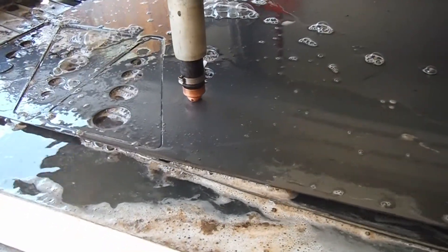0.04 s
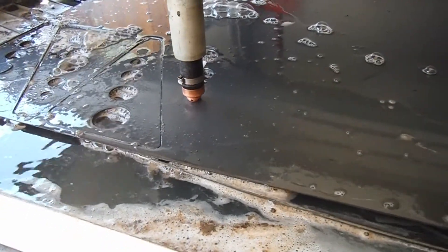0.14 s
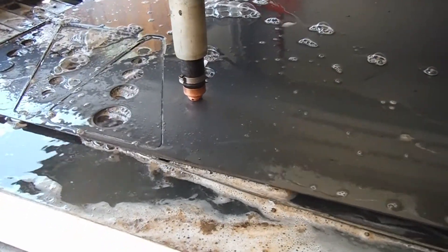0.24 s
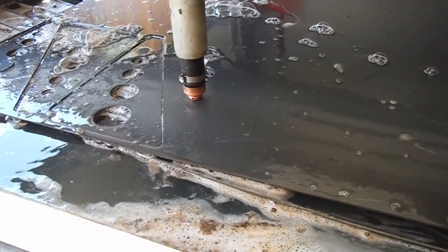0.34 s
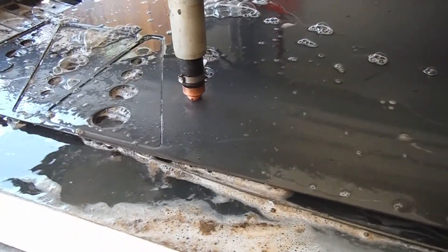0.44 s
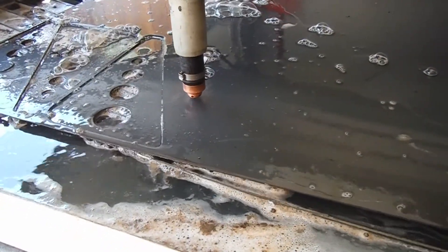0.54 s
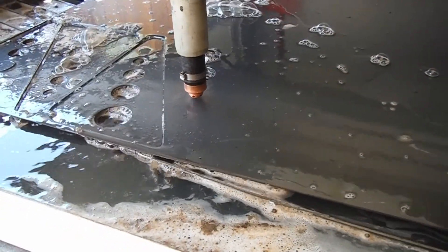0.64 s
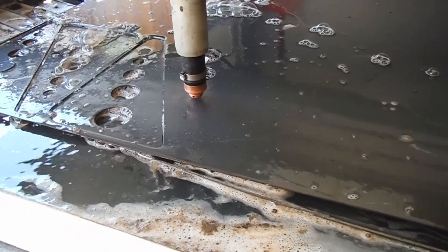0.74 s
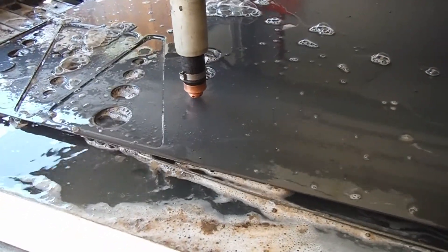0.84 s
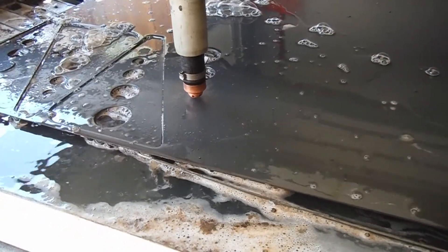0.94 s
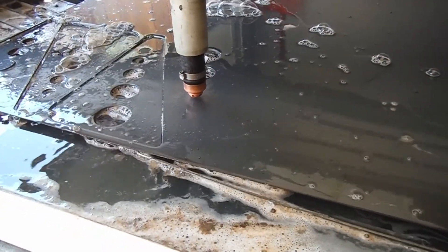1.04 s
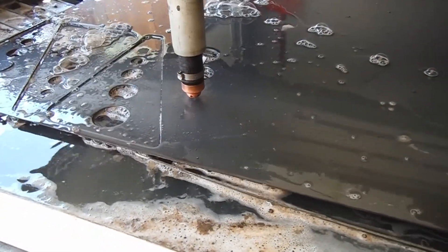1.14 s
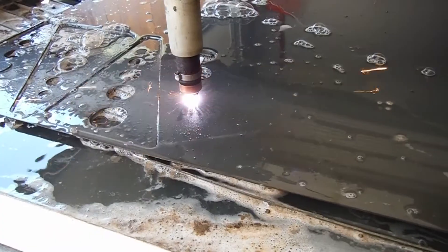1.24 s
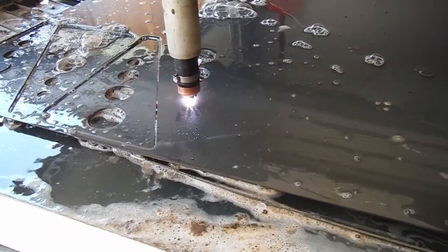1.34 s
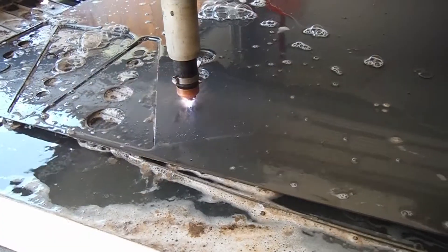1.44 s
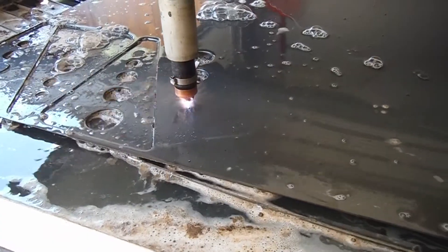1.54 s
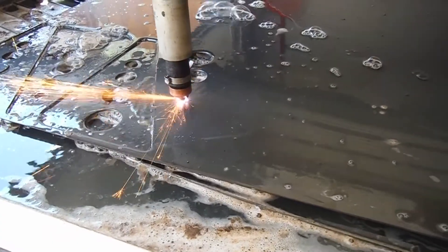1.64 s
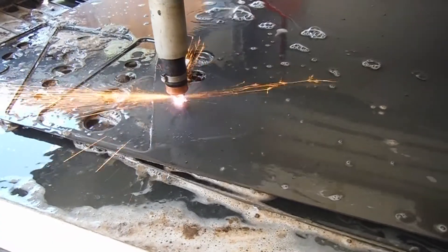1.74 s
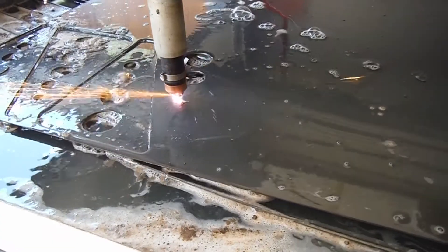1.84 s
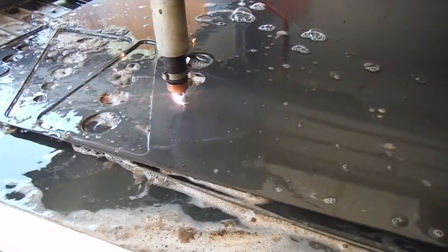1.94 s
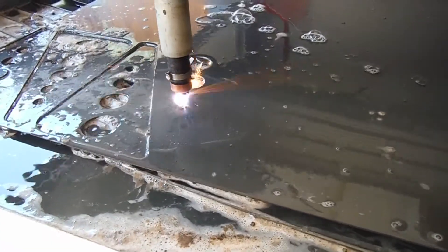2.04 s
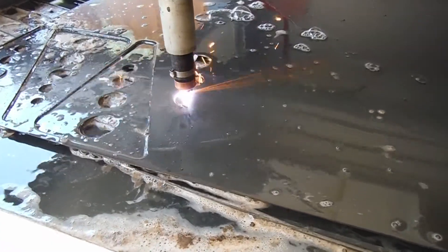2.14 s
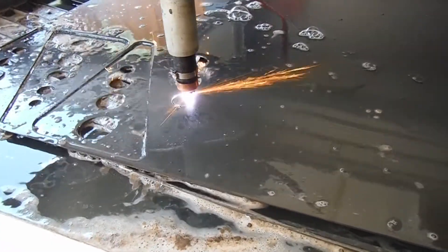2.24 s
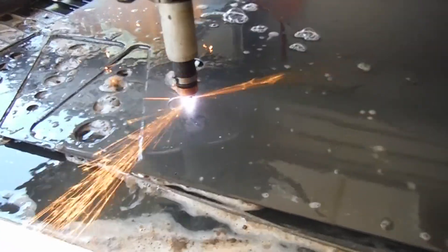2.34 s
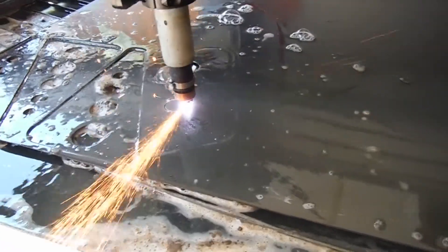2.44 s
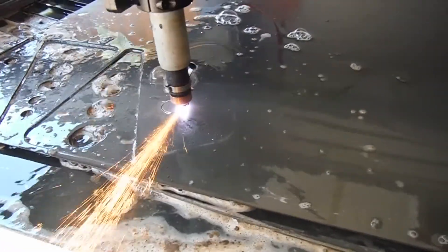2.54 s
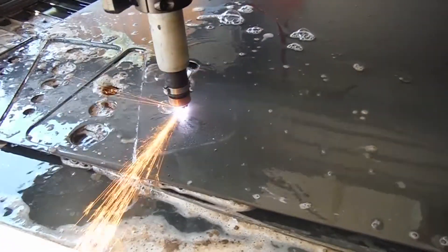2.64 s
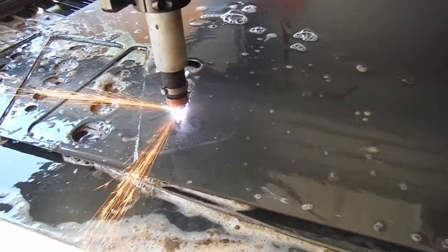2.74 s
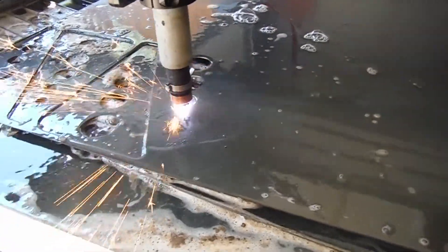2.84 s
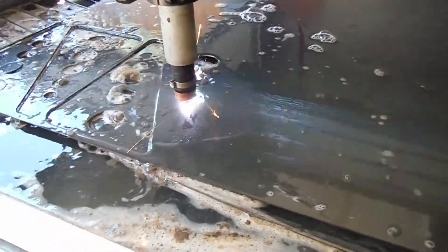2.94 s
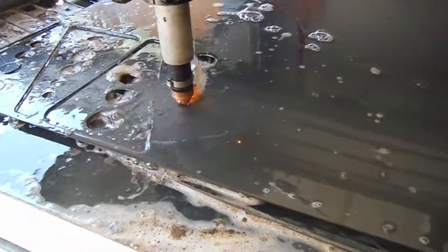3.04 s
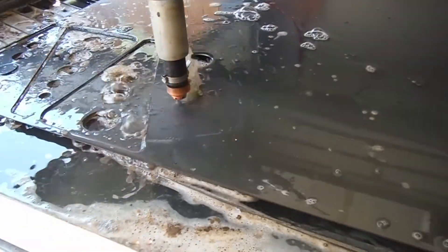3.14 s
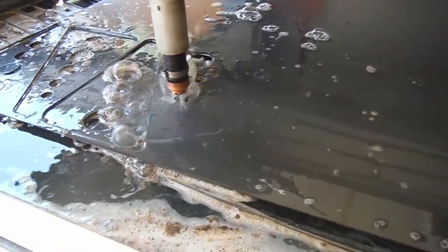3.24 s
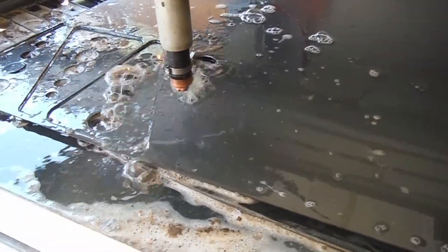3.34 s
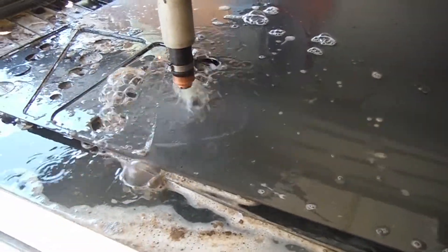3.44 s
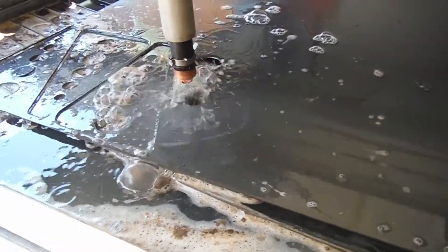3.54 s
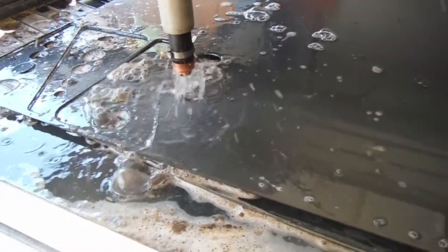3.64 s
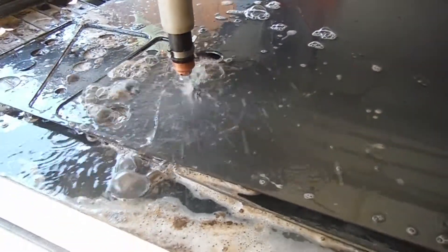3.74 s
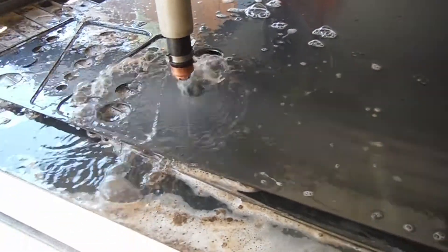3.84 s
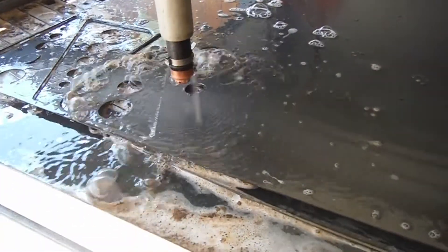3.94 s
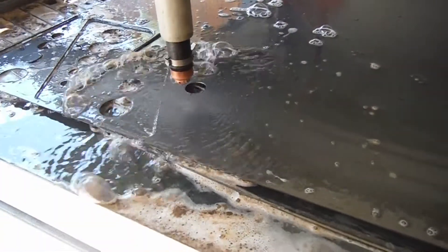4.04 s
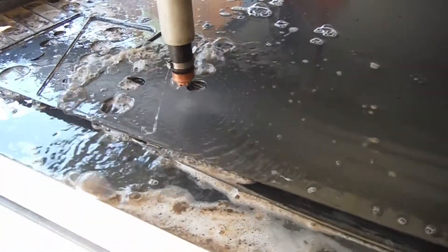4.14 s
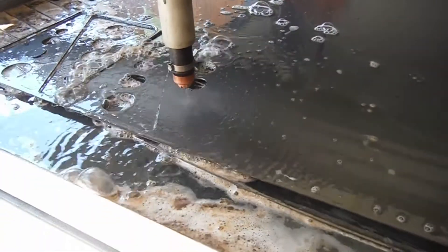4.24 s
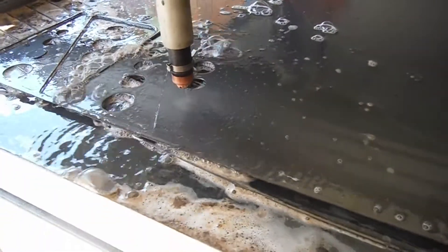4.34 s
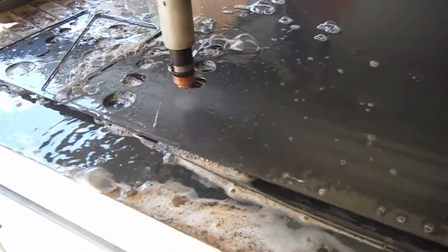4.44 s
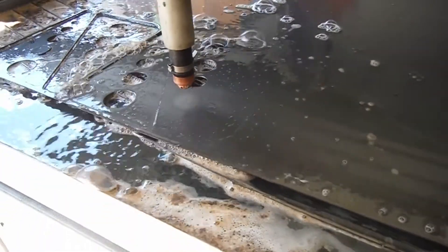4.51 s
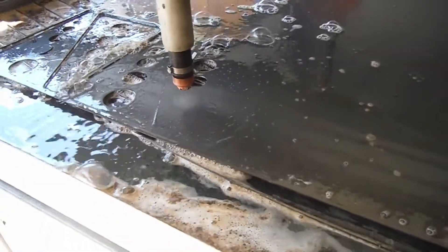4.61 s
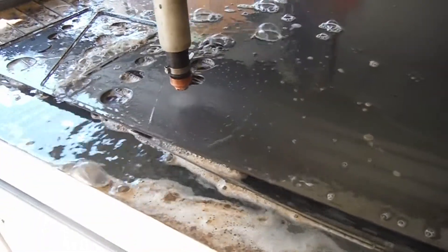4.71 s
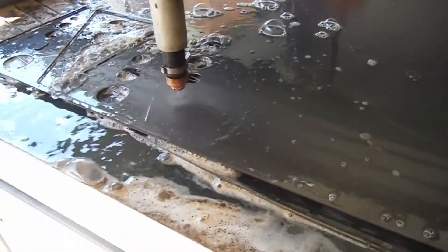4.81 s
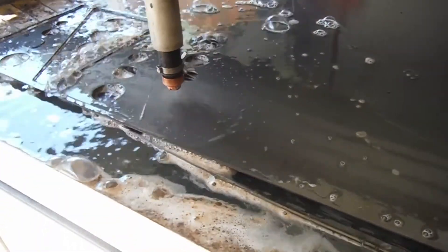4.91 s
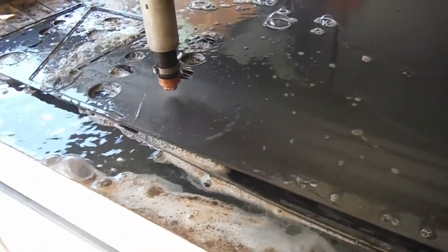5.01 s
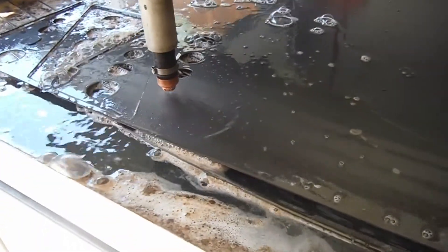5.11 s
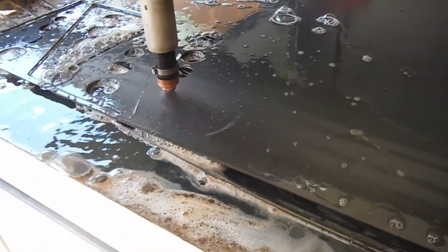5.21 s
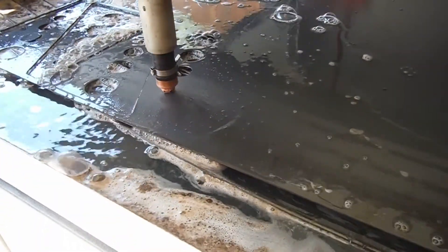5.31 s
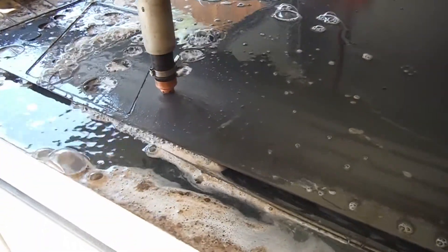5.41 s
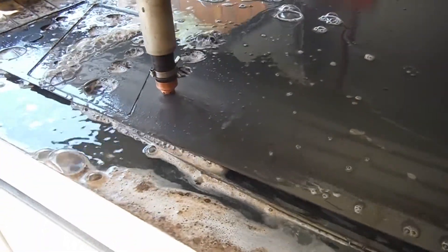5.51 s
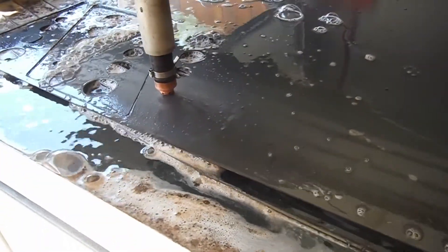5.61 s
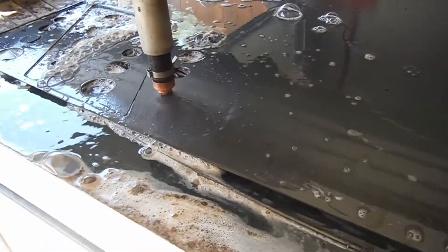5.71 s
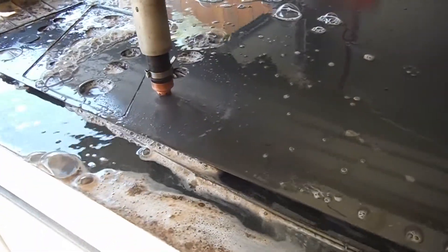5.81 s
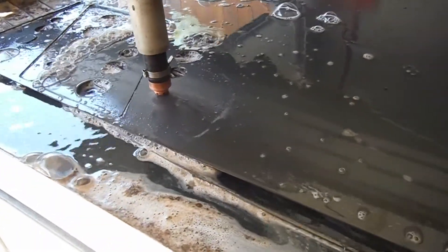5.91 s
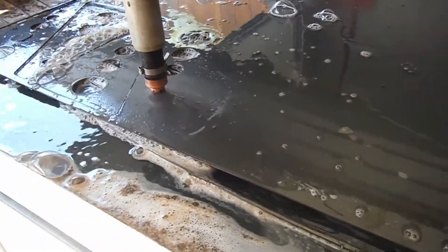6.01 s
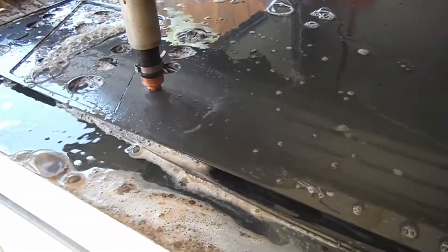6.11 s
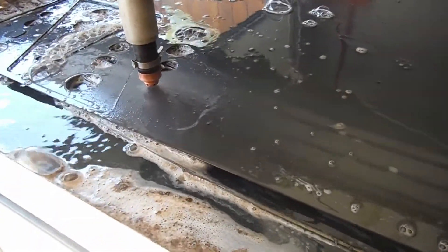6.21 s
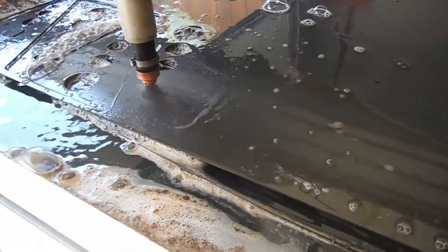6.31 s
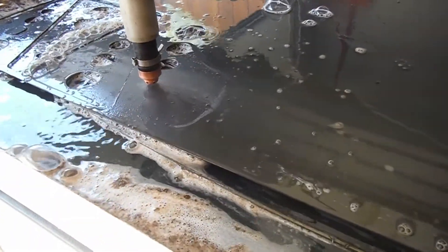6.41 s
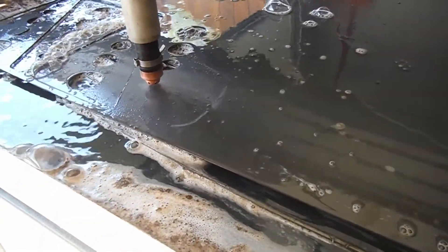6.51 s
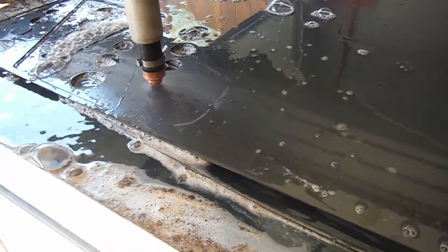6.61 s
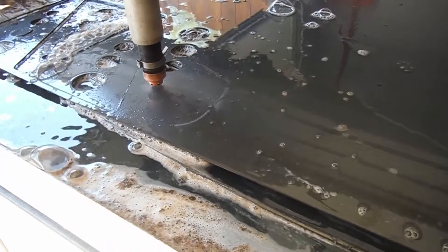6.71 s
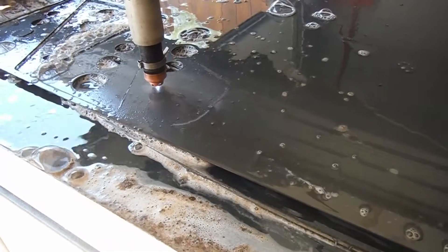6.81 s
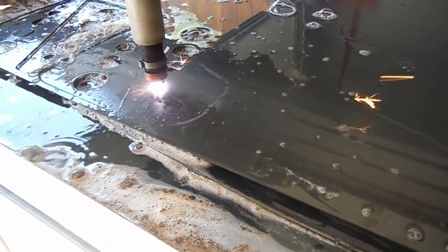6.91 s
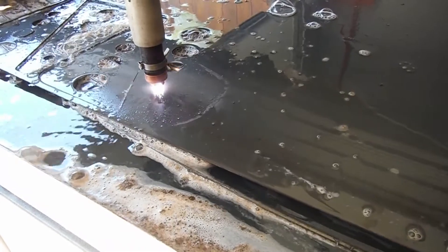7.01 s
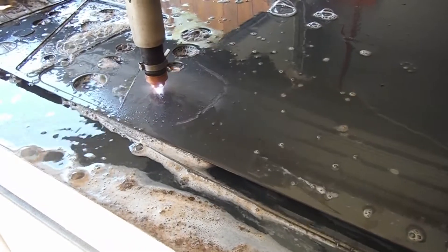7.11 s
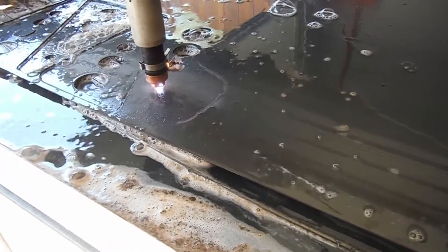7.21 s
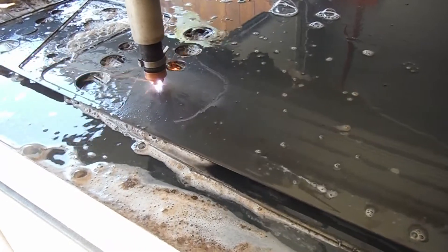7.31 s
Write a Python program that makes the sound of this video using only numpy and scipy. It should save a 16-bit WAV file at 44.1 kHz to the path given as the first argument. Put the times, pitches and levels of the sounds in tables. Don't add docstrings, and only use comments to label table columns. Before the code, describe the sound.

A harsh overloaded jet of air stops, clicks back on with a ringing arc strike, gurgles and spits over water, then hisses, fades and restrikes.

```python
import sys
import numpy as np
from scipy import signal
from scipy.fft import rfft, irfft
from scipy.io import wavfile
from scipy.ndimage import uniform_filter1d, map_coordinates

SR = 44100
rng = np.random.default_rng(int(sys.argv[2]) if len(sys.argv) > 2 else 0)


def dump(signal):
    limited = np.clip(np.atleast_2d(signal).T, -1, 1)
    pcm = np.round(limited * 32767).astype(np.int16)
    wavfile.write(sys.argv[1], SR, pcm)


def to_linear_factor(level_db):
    exponent = np.asarray(level_db, float) / 20
    return 10 ** exponent


N = 324576


def rms_one(x):
    return x / np.sqrt(np.mean(x ** 2) + 1e-20)


def in_time(rows, since=0):
    s, *columns = np.transpose(rows)
    t = np.arange(N) / SR - since
    return np.array([np.interp(t, s, column) for column in columns])


def coloured(spectrum):
    hz, level_db = np.transpose(spectrum)
    grid = np.fft.rfftfreq(N, 1 / SR) + 1
    gain = to_linear_factor(np.interp(np.log(grid), np.log(hz), level_db))
    return rms_one(irfft(rfft(rng.standard_normal(N)) * gain, N))


def drift(rate):
    step = 40
    r = np.exp(-2 * np.pi * step * rate / SR)
    slow = signal.lfilter([1], [1, -2 * r, r * r], rng.standard_normal(N // step + 2002))[2000:]
    return np.interp(np.arange(N) / step, np.arange(len(slow)), rms_one(slow))


def ring(clicks, hz, t60):
    r = to_linear_factor(-60 / (t60 * SR))
    w = 2 * np.pi * hz / SR
    return signal.lfilter([0, np.sin(w)], [1, -2 * r * np.cos(w), r * r], clicks + 1e-18)


def high_pass(x, hz, order):
    return signal.sosfilt(signal.butter(order, hz, "high", fs=SR, output="sos"), x)


# (frequency [Hz], level [dB per Hz])
FLOOR_SPECTRUM = [(25, -18), (60, 1.5), (100, -20), (160, -7), (300, -16), (500, -22), (1000, -21),
                  (1500, -20.5), (3000, -36), (6000, -25), (9000, -23), (11000, -29), (15000, -60)]
# (start [s], end [s], pitch [Hz], width [Hz], level [dB])
MACHINE_HUMS = [
    (0, 7.36, 72, 35, -45),
    (.5, 1.3, 888, 30, -50),
    (.97, 1.0, 1200, 20, -55),
    (.95, .99, 600, 20, -56),
    (6.7, 7.0, 431, 8, -51),
    (6.3, 7.0, 1290, 40, -59),
    (6.6, 7.0, 813, 30, -61),
    (6.5, 6.6, 1130, 20, -59),
]


def shop():
    out = to_linear_factor(-45.5) * coloured(FLOOR_SPECTRUM)
    t = np.arange(N) / SR
    for start, end, hz, width_hz, level_db in MACHINE_HUMS:
        t60 = np.log(1000) / np.pi / width_hz
        hum = rms_one(ring(rng.standard_normal(N), hz, t60))
        fade = np.clip(np.minimum(t - start, end - t) / 0.088 + 1, 0, 1)
        out += to_linear_factor(level_db) * hum * fade
    return out


# (time [s], peak level [dB])
RELAY_CLICKS = [
    (1.1671, -7),
    (1.1970, -11),
    (6.8391, -7),
    (6.8691, -12),
]
# (frequency [Hz], level [dB], t60 [s])
RELAY_RINGS = [(4800, -19, .004), (7500, -12, .008), (10500, -20, .003)]
# (time [s], thump level [dB], thump pitch [Hz], ring level [dB], ring pitch [Hz])
ARC_STRIKES = [
    (1.2023, -24, 89, -11, 1965),
    (6.8732, -1.5, 75.5, -4, 1314),
]


def switching():
    clicks, out = np.zeros(N), np.zeros(N)
    for s, peak_db in RELAY_CLICKS:
        clicks[round(s * SR)] = to_linear_factor(peak_db)
    for s, thump_db, thump_hz, ring_db, ring_hz in ARC_STRIKES:
        kick = np.arange(N) == round(s * SR)
        out += ring(kick * to_linear_factor(ring_db), ring_hz, 0.043)
        out -= ring(kick * to_linear_factor(thump_db), thump_hz, 0.023)
        out -= ring(kick * to_linear_factor(thump_db - 9), 2.1 * thump_hz, 0.016)
    out -= to_linear_factor(1.5) * ring(ring(clicks, 5000, .0006), 7500, .0006)
    for hz, level_db, t60 in RELAY_RINGS:
        out += to_linear_factor(level_db) * ring(clicks, hz, t60)
    return out


def whistles(table, width):
    out = np.zeros(N + SR)
    draws = rng.standard_normal((len(table), 2, 3000))
    for (s, length, start_hz, end_hz, level_db), draw in zip(table, draws):
        t = np.arange(round(length * SR)) / SR
        steps = t * width * (start_hz + end_hz) * 1.25
        in_phase, quadrature = [np.interp(steps, np.arange(3000), d) for d in draw]
        turn = 2 * np.pi * (start_hz * t + (end_hz - start_hz) * t ** 2 / (2 * length))
        tone = rms_one(in_phase * np.cos(turn) + quadrature * np.sin(turn))
        out[round(s * SR):][:len(t)] += to_linear_factor(level_db) * tone * np.sin(np.pi * t / length) ** 0.87
    return out[:N]


# (time [s], length [s], start pitch [Hz], end pitch [Hz], level [dB])
AIR_POCKETS = [(1.294, 0.033, 1003, 1110, -21), (1.343, .025, 1150, 1120, -23),
               (2.271, 0.032, 1124, 1708, -8.5), (2.3, 0.026, 1477, 990, -14),
               (2.371, .04, 1317, 1254, -17), (2.41, 0.033, 813, 860, -15), (2.453, 0.064, 1008, 1055, -21),
               (2.5, 0.053, 3400, 2300, -18.5), (2.533, 0.054, 2300, 2120, -18),
               (2.567, 0.044, 1776, 1006, -23), (2.288, 0.025, 4400, 4490, -17),
               (2.707, 0.071, 954, 877, -24.5), (2.818, 0.042, 1640, 1680, -23),
               (2.92, 0.042, 878, 845, -12.5), (2.954, 0.088, 1003, 1048, -17.5),
               (3.0, 0.029, 882, 793, -14.5), (3.74, 0.025, 800, 794, -29), (3.76, 0.044, 1775, 1590, -23),
               (7.32, 0.04, 1278, 1550, -24)]
# (time [s], length [s], start pitch [Hz], end pitch [Hz], level [dB])
FROTH_SPRAY = [(2.199, 0.045, 1010, 1890, -17), (2.21, .04, 4200, 4630, -15), (3.287, .17, 800, 1240, -30),
               (3.42, 0.43, 4585, 4220, -19), (3.458, 0.13, 1000, 1290, -23.5),
               (3.52, 0.194, 1234, 1118, -19), (3.56, 0.129, 3220, 3030, -19),
               (3.57, 0.23, 2047, 2212, -17), (6.96, 0.039, 1006, 600, -26), (7.1, 0.02, 895, 900, -24),
               (2.28, 0.0386, 2227, 2860, -17)]
# (time [s], length [s], start pitch [Hz], end pitch [Hz], level [dB])
WATER_DRIPS = [
    (3.846, 0.073, 1000, 1206, -35),
    (3.905, 0.055, 1175, 775, -34.5),
]


def spits():
    return whistles(AIR_POCKETS, .2) + whistles(FROTH_SPRAY, .21) + whistles(WATER_DRIPS, 0.018)


# (time [s], length [s], start pitch [Hz], end pitch [Hz], level [dB])
NOZZLE_SONG = [
    (0, 1.015, 4050, 4070, -31.5),
    (1.8, 0.34, 9570, 8060, -21),
    (2.1, 1.54, 4080, 4130, -31.5),
    (3.75, 0.56, 5920, 6190, -20),
    (3.8, .45, 8650, 9560, -21),
    (4.8, 0.93, 5890, 6060, -23),
    (4.18, 1.0, 8020, 9020, -15),
]


def gap_song():
    return whistles(NOZZLE_SONG, .052)


# (time [s], half length [s], rumble level [dB], gurgle level [dB])
GAS_SURGES = [(1.21, 0.013, -53, -19), (1.315, 0.045, -17, -18.5), (1.39, 0.11, -11, -24.5),
              (1.47, .07, -18, -27), (1.546, 0.085, -11.5, -33), (1.705, 0.29, -23.5, -25),
              (1.917, .1, -28, -21), (2.242, 0.11, -23, -14), (2.294, 0.052, -25, -11),
              (2.364, 0.052, -20, -21), (2.426, 0.065, -28, -14), (2.54, 0.085, -33, -17.5),
              (2.597, 0.14, -22, -18.5), (2.733, .06, -24, -28), (2.82, 0.089, -25, -14),
              (2.861, 0.085, -22, -13.5), (2.94, 0.018, -9.5, -15), (2.977, .06, -30, -14.5),
              (3.008, 0.054, -19, -23), (3.083, 0.067, -24, -27), (3.602, 0.25, -28, -19),
              (6.892, 0.017, -24, -23), (7.003, 0.07, -13.5, -20.5), (7.044, 0.13, -13.5, -25),
              (7.134, 0.15, -11, -28), (7.223, 0.13, -10.5, -23.5), (7.277, 0.068, -13, -19),
              (7.35, .05, -29, -17)]
RUMBLE_BED_DB, GURGLE_BED_DB = -34.5, -22.5


def surges():
    t = np.arange(N) / SR
    pierced, arc_off, lifted = 1.64, 4.3, 3.4
    opening_db = 90 * np.maximum(pierced - t, 0)
    draining_db = 45 * np.maximum(t - lifted, 0)
    shut_db = opening_db + draining_db
    rumble_bed_db = np.interp(t, [arc_off, lifted], [RUMBLE_BED_DB, -40])
    out = np.maximum([rumble_bed_db - shut_db, GURGLE_BED_DB - shut_db], -49.5)
    for s, half, *peaks_db in GAS_SURGES:
        away = np.maximum(t - s, (s - t) / 0.67) / half
        out = np.maximum(out, np.c_[peaks_db] - 9.5 * away)
    return out


def grains(per_s, spread_db, pitches_hz, cycles, weight):
    sizes = to_linear_factor(spread_db * np.minimum(rng.exponential(1, N), 4)) * rng.choice([-1, 1], N)
    clicks = sizes * (rng.random(N) < per_s / SR)
    dealt = rng.integers(0, len(pitches_hz), N)
    norm = np.sqrt(sum(weight(hz) ** 2 for hz in pitches_hz))
    out = np.zeros(N)
    for k, hz in enumerate(pitches_hz):
        out += np.sqrt(hz) * ring(clicks * (dealt == k) * weight(hz) / norm, hz, cycles / hz)
    return rms_one(out)


def kerf():
    rumble_db, gurgle_db = surges()
    rumble_hz = 380 * 2 ** (-.014 * (rumble_db - RUMBLE_BED_DB))
    gurgle_hz = 2300 * 2 ** (-.06 * (gurgle_db - GURGLE_BED_DB))
    rumble = grains(2500, 1.5, np.geomspace(170, 850, num=14), 9.0,
                    lambda hz: .2 + np.exp(-np.log(hz / rumble_hz) ** 2 / .09))
    gurgle = grains(2500, 0.81, np.geomspace(700, 5500, num=16), 9.5,
                    lambda hz: 0.5 + np.exp(-np.log(hz / gurgle_hz) ** 2 / 1.1))
    rumble = high_pass(rumble, 175, order=3)
    gurgle = high_pass(gurgle, 400, order=3)
    return to_linear_factor(rumble_db - 8.5) * rumble + to_linear_factor(gurgle_db - 2 + 2.54 * drift(26)) * gurgle


# (time [s], level [dB], brightness [dB])
AIR_FLOW = [(0, -9.5, -0.5), (.5, -9.5, -.5), (.77, -10, 0), (1.2, -9, 5.5), (1.43, -9.5, 0),
            (1.85, -7.5, 3.5), (2.05, -7, 3), (2.13, -8.5, 2.5), (2.9, -9, 4), (3.12, -9.5, 1),
            (3.47, -7.5, -1.2), (3.6, -9.5, -1.5), (4.79, -11, 1), (5.1, -10, -0.6), (6.46, -10.5, 0),
            (6.9, -9.5, 7.5), (7.02, -11, 0.5), (7.36, -8, 3.5)]
# (valve shuts [s], relay pulls in [s])
VALVE_CYCLES = [
    (.755, 1.1671),
    (6.435, 6.8391),
]
RESTART_TIMES = [-.018, -.005, -.003, .002, .008, .027, .0332, .0342]
# (body level [dB], top re body [dB], edge re body [dB])
RESTART_LEVELS = [
    (-59, -14, -25),
    (-37, -9, -23),
    (-36, -16, -28),
    (-33, -21, -34),
    (-31, -8, -22),
    (-24, -7, -20),
    (-21, -6, -16),
    (-9, -3, -16),
]
SPRAY_TIMES = [1.5, 3.4, 4.1, 5.3]


def valve():
    t = np.arange(N) / SR
    level_db, bright_db = in_time(AIR_FLOW)
    spray_loss_db = 4 * np.interp(t, SPRAY_TIMES, [0, 1, 1, 0])
    out = np.array([level_db, -7 + bright_db, -17.5 + 0.28 * bright_db - spray_loss_db])
    for shut, relay in VALVE_CYCLES:
        first, struck = relay + RESTART_TIMES[0], relay + RESTART_TIMES[-1]
        loss_db = 190 * (np.hypot(t - shut, 0.13) - 0.13) * (t > shut) * (t < first)
        out -= [loss_db, 0.2 * loss_db, np.minimum(0.58 * loss_db, 12)]
        restart = in_time(np.c_[RESTART_TIMES, RESTART_LEVELS], relay)
        out = np.where((t >= first) & (t < struck), restart, out)
    return out


def echo(x, delay_ms, strength):
    late = map_coordinates(x, [np.arange(N) - delay_ms * SR / 1000], order=3, mode="nearest")
    late = np.convolve(late, [0.16, 0.68, 0.16], "same")
    return (x + strength * late) / np.sqrt(1 + strength ** 2)


# (time [s], centre [Hz], depth [0-1])
GAP_NOTCH = [
    (3.74, 5600, 0.0),
    (3.82, 5330, .6),
    (4.1, 5250, 0.6),
    (4.25, 5800, 0.5),
    (4.6, 6100, 0.16),
    (5.0, 7300, 0),
    (5.25, 7600, 0.2),
]


def dip(x):
    centre_hz, depth = in_time(GAP_NOTCH)
    turn = 2 * np.pi * np.cumsum(centre_hz) / SR
    span = round(SR / 760)
    band = np.zeros(N)
    for carrier in (np.cos(turn), np.sin(turn)):
        band += carrier * uniform_filter1d(uniform_filter1d(x * carrier, span), span)
    return x - 2 * depth * band


# (frequency [Hz], level [dB per Hz])
BODY_SPECTRUM = [(1500, -25.5), (2500, -12.5), (3400, -9), (3700, -9.5), (4000, -4), (4700, -6),
                 (5500, -2.5), (6500, -1.5), (8000, 2), (9300, 0.5), (10500, -15), (13000, -53)]
# (frequency [Hz], level [dB per Hz])
TOP_SPECTRUM = [(7000, -54), (9000, -7), (10000, 7.5), (11500, 5.5), (13000, 4.5), (13800, -14),
                (16000, -35)]
# (frequency [Hz], level [dB per Hz])
EDGE_SPECTRUM = [(11000, -34), (12800, -10), (13600, -2.5), (14500, -9), (16000, -7.5), (19000, -23.5)]
# (time [s], delay [ms], strength [0-1])
SHEET_BOUNCE = [(0, 0.14, 0.36), (.8, 0.16, .44), (1.25, 0.13, 0.1), (1.45, .16, 0.43), (1.75, .12, 0.02),
                (2.15, .14, 0.47), (3.2, 0.15, 0.36), (3.55, 0.26, 0), (3.78, 0.28, 0.17), (4.1, .3, 0.3),
                (4.25, 0.249, .25), (4.55, 0.224, 0.3), (5.0, .19, .32), (5.25, 0.16, 0.44),
                (5.6, 0.14, 0.23), (6.5, 0.14, 0.34), (6.9, .18, 0), (7.1, .14, 0.43)]
# (delay [ms], strength [0-1])
WALL_BOUNCES = [(0.616, 0.081), (1.129, 0.023), (1.9, 0.042), (3.102, 0.026)]


def jet(body_db, top_db, edge_db):
    body = coloured(BODY_SPECTRUM) * to_linear_factor(0.55 * drift(23) + 0.5 * drift(45))
    top = coloured(TOP_SPECTRUM) * to_linear_factor(top_db + 0.5)
    edge = coloured(EDGE_SPECTRUM) * to_linear_factor(edge_db + 5.5)
    flicker = to_linear_factor(0.096 * drift(13) + 0.89 * drift(84))
    delay_ms, strength = in_time(SHEET_BOUNCE)
    hiss = echo(body + (top + edge) * flicker, delay_ms, strength)
    hiss = echo(hiss, 2 * delay_ms, 0.067 * strength ** 2)
    hiss = echo(hiss, .145, .2)
    for wall_ms, share in WALL_BOUNCES:
        hiss = echo(hiss, wall_ms, share)
    return to_linear_factor(body_db) * dip(hiss)


def scene():
    levels_db = valve()
    headroom = to_linear_factor(3 * to_linear_factor(2 * (levels_db[0] + 8.5)))
    torch = jet(*levels_db) + kerf() + spits() + gap_song()
    return np.tile(headroom * torch + shop() + switching(), (2, 1))


# (time [s], level [dB], low edge [Hz])
SIDE_FLECKS = [(.033, -21, 5200), (.358, -21, 10700), (.606, -22, 4340), (.606, -16, 5060),
               (.637, -26, 10500), (1.425, -18, 6739), (1.728, -12, 6400), (1.937, -20.5, 5630),
               (2.364, -19, 9600), (2.587, -19.5, 11400), (2.798, -24, 8800), (2.821, -15, 5450),
               (3.052, -16, 5530), (3.052, -28, 4200), (3.373, -14.5, 6700), (3.633, -26, 9900),
               (4.048, -16, 6739), (4.048, -20, 8000), (4.42, -27, 5620), (4.683, -21, 9300),
               (5.451, -21, 4500), (5.617, -24, 4200), (5.617, -19, 5360), (5.617, -17, 7060),
               (5.744, -16, 5500), (6.026, -13, 5300), (6.441, -26.5, 4530), (6.907, -15, 7140),
               (6.909, -19, 5200), (7.184, -28, 9800)]
TOP_FLECK_TIMES = [.358, .614, .66, 1.799, 2.587, 2.819, 4.12, 4.423, 4.682, 5.49, 5.745, 6.024, 6.188]


def side_flecks():
    size = 2048
    side = np.zeros(N + 2 * size)
    window = np.clip(1.36 * np.hanning(size) - .5, 0, 1)
    grid = np.fft.rfftfreq(size, 1 / SR)
    flecks = list(SIDE_FLECKS) + [(s, -32, 13600) for s in TOP_FLECK_TIMES]
    for s, level_db, low_hz in flecks:
        in_band = (grid > low_hz) * (grid < min(1.27 * low_hz, 15600))
        band = irfft(rfft(rng.standard_normal(size)) * in_band, size)
        at = round(s * SR) + size // 2
        side[at:at + size] += to_linear_factor(level_db + 5.0) * rms_one(band) * window
    return side[size:size + N]


def roll_off(x):
    return signal.sosfilt(signal.butter(12, 15690, fs=SR, output="sos"), x)


def record(dry):
    top, knee = .67, 4.5
    squashed = dry / (1 + np.abs(dry / top) ** knee) ** (1 / knee)
    mix = high_pass(squashed, 39, order=1) + side_flecks() * [[1], [-1]]
    return roll_off(mix)


dry = scene()
out = record(dry)
dump(out)
```